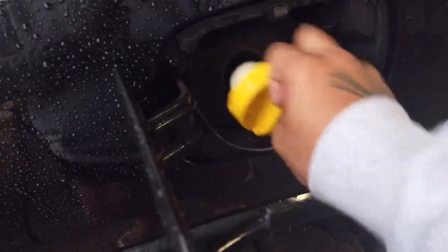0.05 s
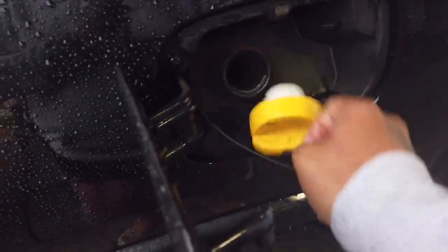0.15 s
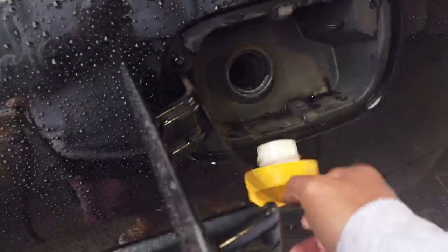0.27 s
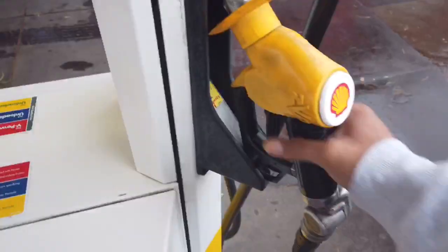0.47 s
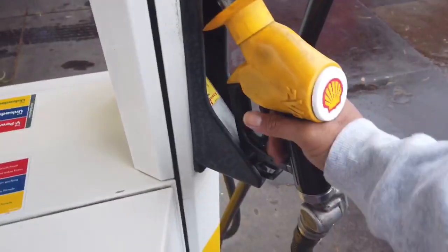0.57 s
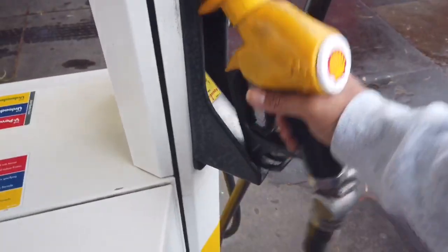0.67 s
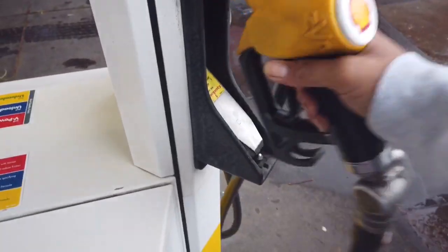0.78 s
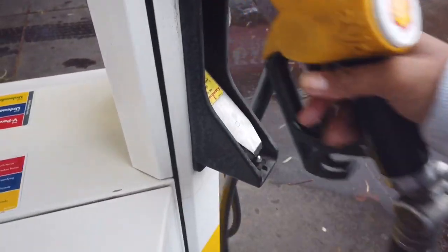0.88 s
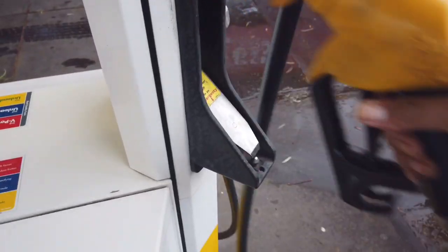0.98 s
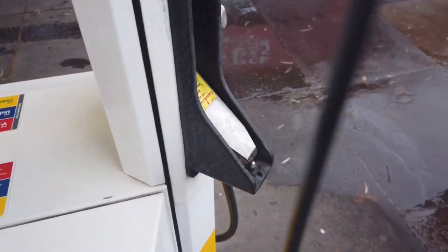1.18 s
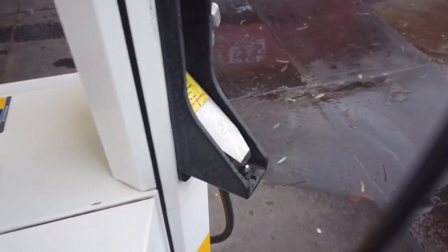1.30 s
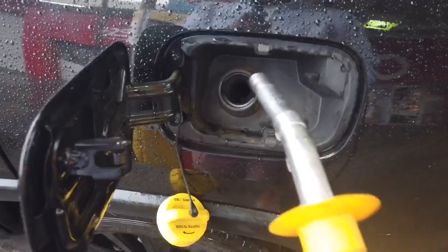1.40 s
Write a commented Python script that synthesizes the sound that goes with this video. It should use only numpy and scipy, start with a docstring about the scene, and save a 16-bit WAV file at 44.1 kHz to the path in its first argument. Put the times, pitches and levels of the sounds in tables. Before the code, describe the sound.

A plastic fuel cap clacks off, then a pump nozzle is lifted with rattling clunks.

```python
"""At a filling station, over faint forecourt noise, a plastic fuel cap rubs in its thread and twists off
in a few hollow clacks, each exciting the modes of cap and filler neck; car body and canopy answer briefly.
The whole sound fades out and in. The nozzle is then lifted, clunking and rattling, and its hardest clank
rings a small spring. It slides along its holster, clicks once more in the hand and is carried away with
a faint swish. Last, the sound fades out and in again."""
import sys
import numpy as np
from scipy import signal
from scipy.fft import rfft, irfft, next_fast_len
from scipy.io import wavfile
from scipy.ndimage import uniform_filter1d

SR = 44100
rng = np.random.default_rng(int(sys.argv[2]) if len(sys.argv) > 2 else 0)


def dump_mix(stems):
    """Bounce the given channels to the path in sys.argv[1] as a 16-bit WAV at rate SR."""
    frames = np.atleast_2d(stems).T  # one column per channel
    limited = np.clip(frames, -1, 1)  # hard clip at full scale
    pcm = np.round(limited * 32767).astype(np.int16)
    wavfile.write(sys.argv[1], SR, pcm)


N = 63945
T = np.arange(N) / SR

# forecourt noise spectra (frequency [Hz], relative density [dB])
CAR_AIR_SPECTRUM = [(30, -26.5), (110, -7), (170, -5.5), (400, -7.5), (640, -8), (1200, -3), (1610, -18),
                    (3080, -17), (5000, -30), (7100, -37), (10100, -32), (16000, -56)]
PUMP_AIR_SPECTRUM = [(30, -15), (110, -1), (195, -6), (363, -4.5), (531, -9), (800, -8.5), (1300, -21.5),
                     (2110, -15.5), (3340, -19), (4200, -27), (6300, -32.5), (7700, -46), (10100, -41),
                     (16000, -44)]
RUMBLE_SPECTRUM = [(12, -31.5), (29, -3.5), (45, -12), (70, -16.5), (110, -20.5), (200, -44), (600, -100)]
HISS_SPECTRUM = [(4000, -55), (7000, -20), (9000, -6.5), (10500, 3.5), (12500, -33.5), (15000, -28.5)]
# envelope of the high hiss (time [s], level [dB])
HISS_ENVELOPE = [(0, -63), (.62, -60), (.78, -69.5), (1.25, -70), (1.45, -58)]
# rubbed resonances of cap in thread and nozzle on holster (frequency [Hz], bandwidth [Hz], gain [dB])
THREAD_RESONANCES = [(280, 22, 6), (580, 19, 0.5), (854, 27, 3.5), (1100, 30, -6.5), (1400, 32, -16),
                     (3020, 59, -15), (5400, 96, -14.5)]
HOLSTER_RESONANCES = [(307, 23, -3), (384, 54, 0.5), (640, 13, 1.5), (770, 7.5, -8), (2260, 50, -25.5),
                      (2430, 50, -18)]
# ticks of the catches (time [s], level [dB], t60 [s])
CATCH_TICKS = [(0.088, -50, 0.024), (0.2185, -33, .016), (0.37, -36.5, 0.014), (0.7882, -28.5, 0.013),
               (.8365, -30.5, .035)]
# hard edges snapping into place (time [s], level [dB], frequency [Hz], t60 [s])
EDGE_SNAPS = [(0.214, -17.5, 4610, 0.015), (.2156, -8, 717, 0.042), (.2167, -17.5, 3280, 0.014),
              (0.3009, -27, 4760, 0.0091), (.3265, -25.5, 5000, .014), (0.5816, -36.5, 2800, 0.018),
              (0.7557, -23.5, 2474, 0.034), (.9195, -24.5, 870, 0.047), (1.1163, -15.5, 2976, 0.013),
              (1.1172, -15.5, 672, 0.063), (1.1177, -32, 425, 0.11)]
# impacts (time [s], thump [dB], body [dB], crack [dB], body rise [s], body t60 [s],
# low ring [dB], its centre [Hz], high ring [dB], its centre [Hz])
CAP_IMPACTS = [(.2141, -13, -11, -18.5, 0.0021, 0.024, -17.5, 364, -24.5, 3550),
               (.2228, -34.5, -27.5, -37, 0.00019, 0.072, -14.5, 775, -30, 3000),
               (.3008, -15.5, -8.5, -28, 0.00015, 0.01, -33, 292, -37.5, 4700),
               (.3058, -20, -17.5, -29, 0.0017, 0.052, -13.5, 243.5, -34, 1400),
               (.3261, -17.5, -12, -30, 0.00013, 0.023, -17.5, 239, -20, 1460),
               (.3365, -15.5, -5, -36, 0.0016, 0.0086, -56.5, 732, -49.5, 1400),
               (.3645, -38.5, -23.5, -34.5, 0.001, 0.061, -14.5, 760, -25.5, 1335),
               (.3692, -33.5, -13.5, -24, 0.00094, 0.031, -15.5, 405, -16, 2490),
               (.3762, -57, -19, -36.5, 0.00053, 0.045, -43, 730, -48, 1400)]
NOZZLE_IMPACTS = [(.6605, -66, -49, -42, 0.0002, 0.086, -48, 785, -37, 2640),
                  (.683, -42, -49, -50.5, 0.0014, 0.043, -44.5, 785, -56, 2600),
                  (.7555, -59.5, -49.5, -37.5, 0.00032, 0.14, -61.5, 260, -29, 2450),
                  (.768, -28.5, -40, -46, 0.0017, 0.063, -50, 263, -33.5, 2360),
                  (.7782, -28, -37, -36, 0.00035, 0.02, -45, 254, -23, 3260),
                  (.7805, -27.5, -22, -20.5, 0.0088, 0.073, 1, 251.4, -20, 1943),
                  (.7888, -19.5, -28, -21.5, 0.0012, 0.037, -33, 1020, -23.5, 2875),
                  (.8345, -32, -19.5, -18.5, 0.0031, 0.075, -22, 408, -18.5, 2150),
                  (.8565, -31.5, -60, -28.5, 0.00047, 0.095, -19, 798, -26, 2810),
                  (.9188, -38, -41, -45, 0.00018, 0.11, -27.5, 762, -36.5, 2120),
                  (1.094, -44, -28.5, -40.5, 0.01, 0.11, -22, 650, -50, 2300),
                  (1.1162, -36.5, -33.5, -22, 0.00068, 0.075, -20.5, 600, -55, 1850),
                  (1.138, -34.5, -30, -40, 0.0079, 0.12, -24, 247, -36, 1500),
                  (1.303, -77, -59.5, -54.5, .0005, 0.032, -79, 780, -42, 2800)]
# crowded, short-lived resonances (frequency [Hz], relative density [dB])
CAP_SPECTRUM = [(60, -42.5), (140, 2.5), (350, -9), (800, -7), (1400, -13.5), (2100, -16.5), (3200, -9.5),
                (5000, -4), (7000, -13.5), (10500, -13.5), (13000, -24.5), (16000, -36)]
NOZZLE_SPECTRUM = [(100, -33.5), (200, -1), (330, -7), (480, -4), (700, -2), (920, -2), (1080, -24),
                   (1350, -29.5), (1600, -3.5), (2200, 0), (3000, -7), (4300, -10.5), (5200, -29),
                   (6500, -25), (8500, -17), (11300, -17.5), (12500, -34), (15000, -30), (16000, -40.5)]
# modes of cap with filler neck and of nozzle with holster (frequency [Hz], gain [dB], t60 [s])
CAP_NECK_MODES = [(151, -4.5, .085), (196, -1.5, .085), (281, -3.5, .06), (354, 2.5, .05), (482, -6.5, .05),
                  (713, 0.5, .065), (838, 0, .06), (1050, -7.5, .05), (1380, -2.5, .06), (2820, -4.5, .04),
                  (3270, .5, .035), (4690, -2, .025)]
NOZZLE_HOLSTER_MODES = [(216, .5, .085), (306, 2.5, .09), (392, -1.5, .16), (636, -2.5, .05),
                        (694, -.5, .05), (786, -.5, .11), (852, -4.5, .09), (955, -.5, .09),
                        (1555, -1.5, .12), (1894, -2.5, .06), (2094, -2, .11), (2300, -3, .08),
                        (2449, -2.5, .06), (2640, -7, .07), (2876, -.5, .045), (3060, -1, .04),
                        (3880, -5.5, .045), (4225, -6.5, .04)]
# reverberation time under the canopy (frequency [Hz], t60 [s])
CANOPY_DECAY = [(150, 0.084), (400, .36), (800, 0.15), (2500, 0.37), (10000, 0.26)]
# blunt shoves of the parts against their seats (time [s], level [dB], spectral peak [Hz])
SEAT_SHOVES = [(.2243, -25, 760), (0.3016, -8.5, 820), (.3267, -25.5, 914), (0.7863, -19.5, 446),
               (.7926, -18, 410)]
# spectra of the ticks and the swish (frequency [Hz], relative density [dB])
TICK_SPECTRUM = [(3000, -36.5), (6000, -9.5), (10500, 5), (12500, -4.5), (15000, -9), (16000, -9.5)]
SWISH_SPECTRUM = [(2000, -55.5), (4500, -10), (6800, -9.5), (7600, -20), (16000, -25.5)]
# overall fade, applied on top of every other level (time [s], gain [dB])
OVERALL_FADE = [(0, 0.5), (.38, -4.5), (.42, -10.5), (.46, -20), (.468, -62), (.49, -39), (.52, -21),
                (.57, -9), (.64, -1), (1.19, -3.5), (1.27, -9), (1.33, -19), (1.365, -32), (1.38, -65),
                (1.41, -27), (1.45, -10)]


def amp(db):
    """Amplitude ratio of a level in decibels."""
    return 10 ** (np.asarray(db) / 20)


def unit(x):
    """Normalisation to an rms of 1."""
    return x / np.sqrt(np.mean(x ** 2) + 1e-20)


def along(points, hz):
    """Interpolation on a logarithmic frequency axis."""
    f, v = np.transpose(points)
    return np.interp(np.log(hz + 1), np.log(f + 1), v)


def filtered(x, response):
    """Linear filtering: the spectrum is multiplied by a frequency response."""
    m = next_fast_len(x.shape[-1] + SR // 4)
    return irfft(rfft(x, m) * response(np.fft.rfftfreq(m, 1 / SR)), m)[..., :x.shape[-1]]


def add(track, s, sound):
    """Superposition of a sound on the track from time s."""
    part = track[round(s * SR):][:len(sound)]
    part += sound[:len(part)]


def coloured_noise(spectrum, n):
    """Spectral shaping of white noise."""
    return unit(filtered(rng.standard_normal(n), lambda hz: amp(along(spectrum, hz))))


def rush(spectrum, waver_db):
    """Slow random amplitude modulation makes coloured noise waver."""
    noise = coloured_noise(spectrum, N)
    return noise * amp(waver_db * unit(uniform_filter1d(rng.standard_normal(N), size=1200)))


def forecourt(switch_s=.48, fall_db_per_s=1.5):
    """Broadband ambient noise, beside the car and then the pump, superposed on hiss and rumble."""
    by_car = amp(-42.5 - fall_db_per_s * T) * rush(CAR_AIR_SPECTRUM, waver_db=1.94)
    by_pump = amp(-48.5) * rush(PUMP_AIR_SPECTRUM, waver_db=2.2)
    rumble = amp(-49.5) * rush(RUMBLE_SPECTRUM, waver_db=1.1)
    return np.where(T < switch_s, by_car, by_pump) + high_hiss() + rumble


def high_hiss(patchy_db=2.5):
    """Random modulation in time and frequency makes a faint treble hiss patchy."""
    z = signal.stft(rush(HISS_SPECTRUM, waver_db=1.0), nperseg=256)[2]
    patches = uniform_filter1d(uniform_filter1d(rng.standard_normal(z.shape), 5, axis=0), 4, axis=1)
    hiss = signal.istft(z * amp(patchy_db * unit(patches)), nperseg=256)[1][:N]
    return amp(np.interp(T, *np.transpose(HISS_ENVELOPE))) * unit(hiss)


def rub(peaks, start_s, end_s, level_db, edge_s, slips_per_s=2000):
    """Stick-slip friction: tiny, soft, uneven slips excite the resonances of a sliding part."""
    slips = rng.standard_normal(N) * (rng.random(N) < slips_per_s / SR)
    body = lambda f: sum(amp(db) * 1j * f * w / (c * c - f * f + 1j * f * w) for c, w, db in peaks)
    soft = lambda f: 1 / (1 + (f / (2 * peaks[-1][0])) ** 2) ** 2
    stroke = np.clip(np.minimum(T - start_s, end_s - T) / edge_s, 0, 1)
    return amp(level_db) * stroke * unit(filtered(slips, lambda f: body(f) * soft(f)))


def ticks():
    """Brief excitation is broadband: each catch emits a decaying burst of treble noise."""
    out, t = np.zeros(N), np.arange(SR // 4) / SR
    for s, db, t60 in CATCH_TICKS:
        add(out, s, amp(db - 60 * t / t60) * coloured_noise(TICK_SPECTRUM, len(t)))
    return out


def snaps(rise_s=.0004):
    """Damped oscillation: an edge snapping into place rings briefly at one frequency."""
    out, t = np.zeros(N), np.arange(SR // 8) / SR
    for s, db, hz, t60 in EDGE_SNAPS:
        add(out, s, amp(db - 60 * t / t60) * (1 - np.exp(-t / rise_s)) * np.sin(2 * np.pi * hz * t))
    return out


def impacts(hits, spectrum, modes, thump_life, crack_life, crack_rise, grit_db, lowest_hz):
    """Impact excitation: crowded resonances merge into a noise burst, while clear modes ring out."""
    out, t = np.zeros(N), np.arange(SR // 4) / SR
    hard_db, dull_hz = -23.5, 4000
    # factors on rise time and t60; the rows are thump, body and crack
    rise_scale = np.array([[1], [1], [crack_rise]])
    life_scale = np.array([[thump_life], [1], [crack_life]])
    for s, thump_db, body_db, crack_db, rise, t60, *ring in hits:
        onset = 1 - np.exp(-t / rise)
        envelopes = (1 - np.exp(-t / rise / rise_scale)) * amp(-60 * t / (t60 * life_scale))
        dull_db_per_oct = .44 * max(hard_db - crack_db, 0)  # softer contacts lose treble
        colour = lambda hz: amp(along(spectrum, hz) - dull_db_per_oct * np.log2(1 + hz / dull_hz))
        burst = envelopes * filtered(rng.standard_normal(len(t)), lambda hz: colour(hz) * bands(hz))
        grit = unit(uniform_filter1d(rng.standard_normal(len(t)), size=50))
        burst[2] *= amp(grit_db * grit)
        # each band carries the energy of its envelope
        burst *= np.linalg.norm(envelopes, axis=1, keepdims=True)
        burst /= np.linalg.norm(burst, axis=1, keepdims=True) / np.linalg.norm(envelopes, axis=1)[:, None]
        add(out, s, amp([thump_db, body_db, crack_db]) @ burst + onset * ringing(modes, t, *ring))
    # small parts radiate no deep bass
    return signal.sosfilt(signal.butter(4, lowest_hz, "high", fs=SR, output="sos"), out)


def bands(hz, thump_hz=515, crack_hz=1450):
    """A power-complementary crossover divides an impact into thump, body and crack."""
    low = 1 / (1 + (hz / thump_hz) ** 8)
    high = 1 - 1 / (1 + (hz / crack_hz) ** 8)
    return np.sqrt(np.abs([low, 1 - low - high, high]))


def ringing(modes, t, low_db, low_hz, high_db, high_hz):
    """Modal superposition: the place of contact favours the modes around two frequencies."""
    split_hz, focus_oct, off_focus_db = 1200, .24, -21.5
    out = 0
    for k, (hz, db, t60) in enumerate(modes):
        level, centre = (low_db, low_hz) if hz < split_hz else (high_db, high_hz)
        focus = off_focus_db * (1 - np.exp(-.5 * (np.log2(hz / centre) / focus_oct) ** 2))
        envelope = amp(level + db + focus + rng.normal(0, 1) - 60 * t / t60)
        out = out + (-1) ** k * envelope * np.sin(2 * np.pi * hz * t)
    return out


def canopy(x, wet_db, build_s):
    """Reverberation: diffuse reflections from car, pump and roof follow the direct sound."""
    hz, t, z = signal.stft(rng.standard_normal(SR // 2), SR, nperseg=256)
    tail = signal.istft(z * amp(-60 * t / along(CANOPY_DECAY, hz)[:, None]), SR, nperseg=256)[1]
    tail *= np.clip(np.arange(len(tail)) / SR / build_s, 0, 1) ** 2
    return x + amp(wet_db) * signal.fftconvolve(x, tail / np.linalg.norm(tail))[:N]


def shoves():
    """Acceleration noise: a part that seats hard radiates one swing of pressure."""
    out = np.zeros(N)
    for s, db, hz in SEAT_SHOVES:
        u = 2 * np.pi * hz * (T - s)
        out += amp(db) * u * np.exp((1 - u * u) / 2)
    return out


def nozzle_gap(x, centre_hz=1242, width_hz=170):
    """Band rejection: the nozzle radiates little between its low and high modes."""
    return signal.lfilter(*signal.iirnotch(centre_hz, centre_hz / width_hz, fs=SR), x)


def spring(start_s=.837, level_db=-45, hz=14780, t60=.09):
    """Free vibration of a small steel spring after the hardest clank."""
    out, t = np.zeros(N), np.arange(SR // 4) / SR
    add(out, start_s, amp(level_db - 60 * t / t60) * np.sin(2 * np.pi * hz * t))
    return out


def swish(start_s=1.203, level_db=-52.5, t60=.51):
    """Friction noise: a sleeve or the hose brushes past as the nozzle is carried away."""
    envelope = (T > start_s) * amp(level_db - 60 * np.abs(T - start_s) / t60)
    return envelope * rush(SWISH_SPECTRUM, waver_db=1.5)


def scene():
    """Superposition under one fade: first the cap at the car, then the nozzle at the pump."""
    cap = impacts(CAP_IMPACTS, CAP_SPECTRUM, CAP_NECK_MODES,
                  thump_life=1.85, crack_life=.99, crack_rise=2.0, grit_db=2, lowest_hz=134)
    nozzle = impacts(NOZZLE_IMPACTS, NOZZLE_SPECTRUM, NOZZLE_HOLSTER_MODES,
                     thump_life=2.82, crack_life=.94, crack_rise=.45, grit_db=1, lowest_hz=137)
    cap = canopy(cap, wet_db=-11.5, build_s=.015)
    nozzle = canopy(nozzle_gap(nozzle), wet_db=-16, build_s=.007)
    handling = ticks() + snaps() + cap + shoves() + nozzle + spring() + swish()
    unscrewing = rub(THREAD_RESONANCES, start_s=-.02, end_s=.22, level_db=-44.5, edge_s=.016)
    sliding = rub(HOLSTER_RESONANCES, start_s=.93, end_s=1.166, level_db=-44.5, edge_s=.042)
    fade = amp(np.interp(T, *np.transpose(OVERALL_FADE)))
    return ((forecourt() + unscrewing + handling + sliding) * fade)[None]


def record(dry):
    """Band limiting by an ideal low-pass filter."""
    return filtered(dry, lambda hz: hz < 16100)


dry = scene()
out = record(dry)
dump_mix(out)
```